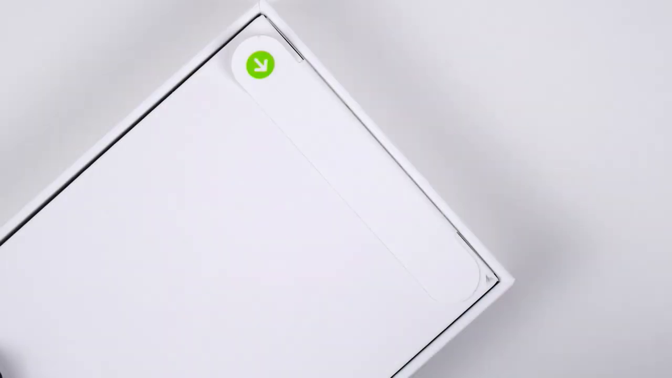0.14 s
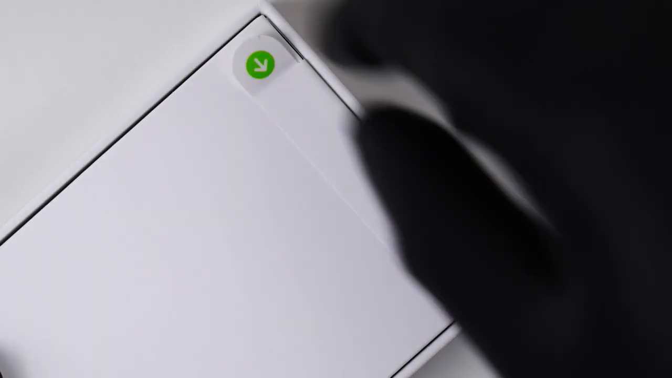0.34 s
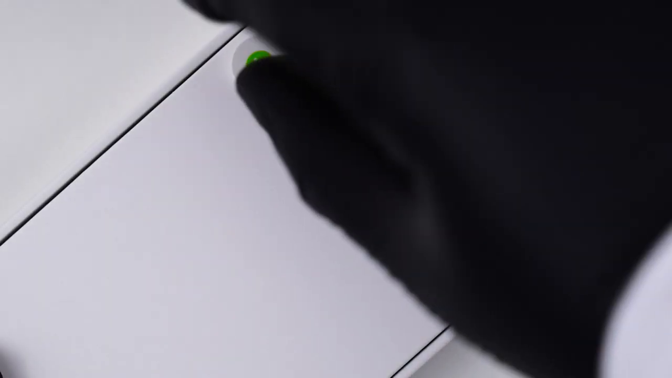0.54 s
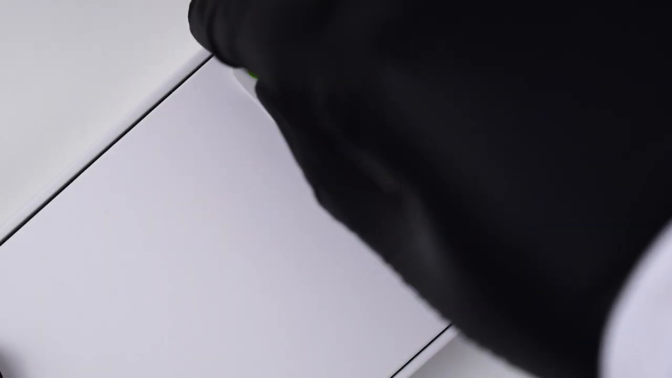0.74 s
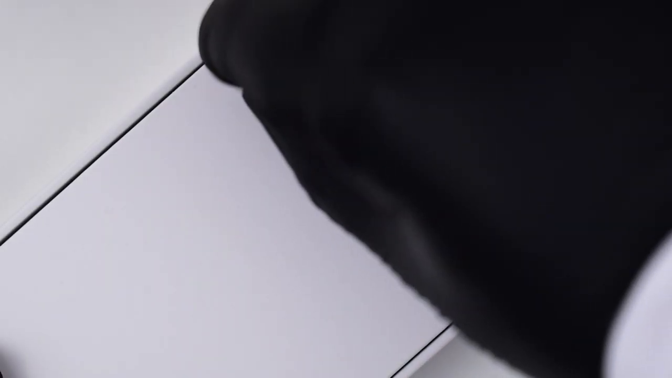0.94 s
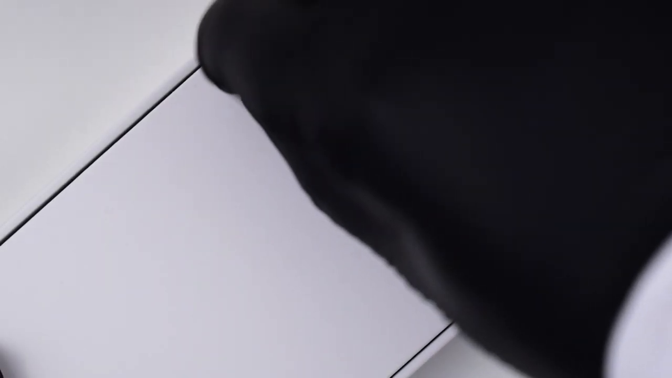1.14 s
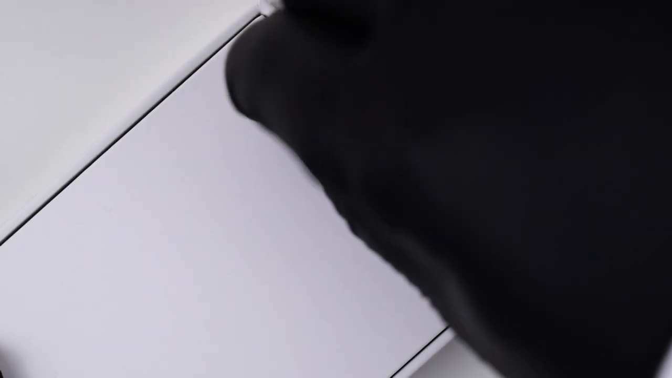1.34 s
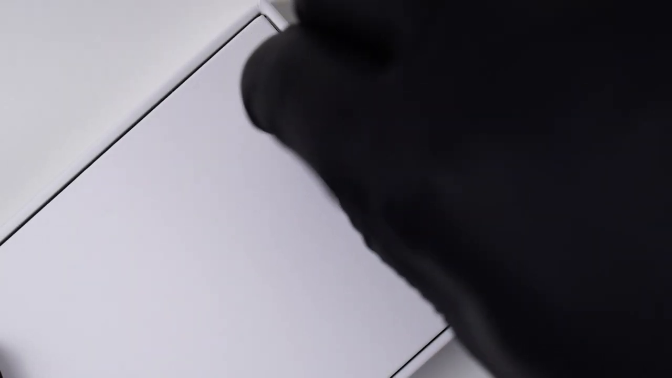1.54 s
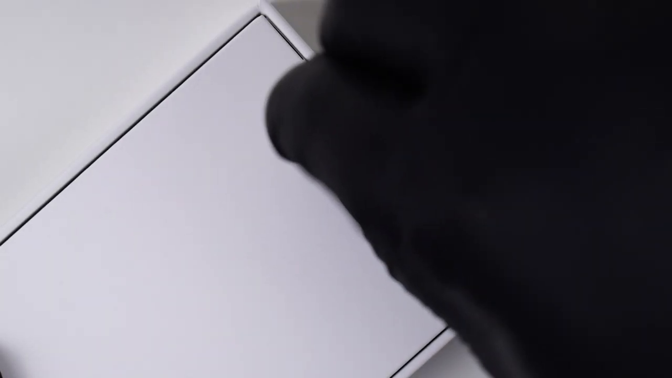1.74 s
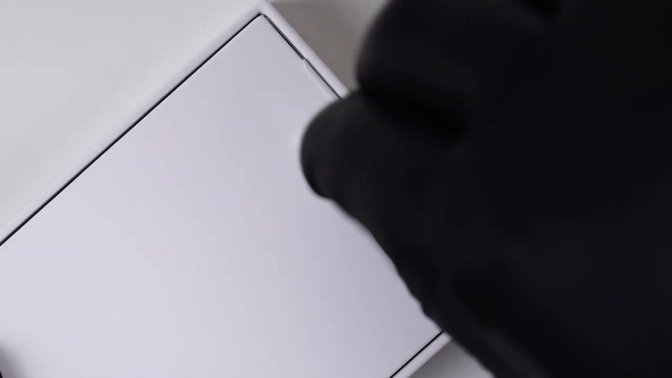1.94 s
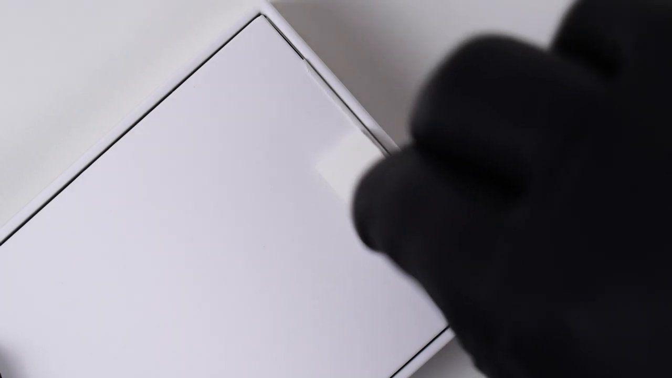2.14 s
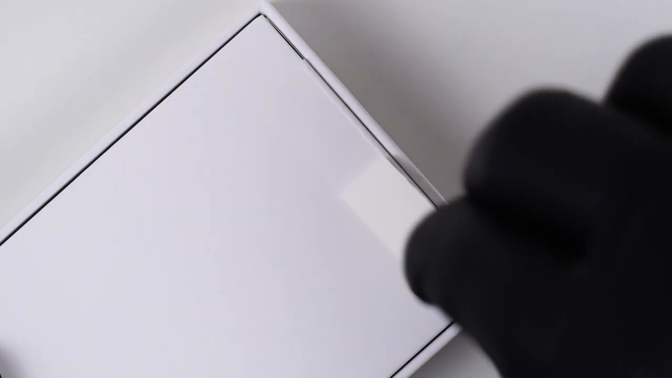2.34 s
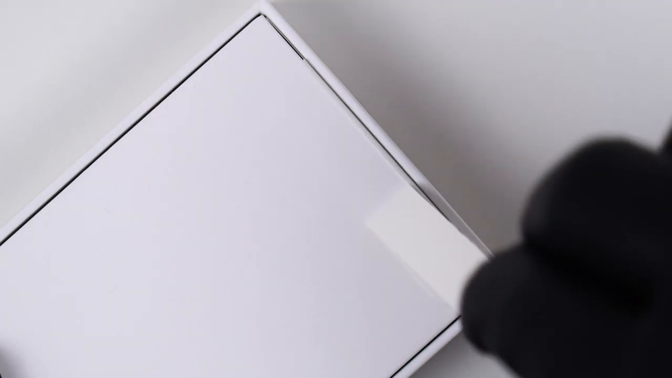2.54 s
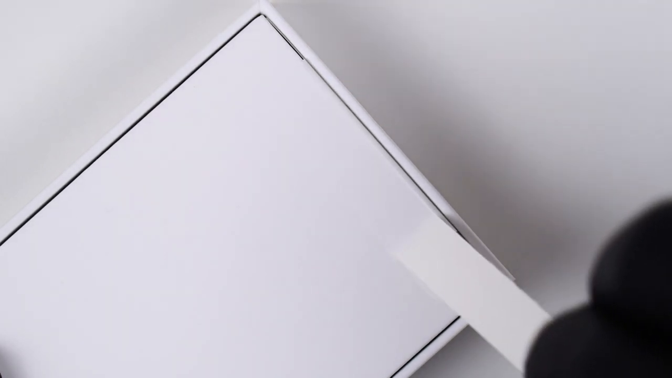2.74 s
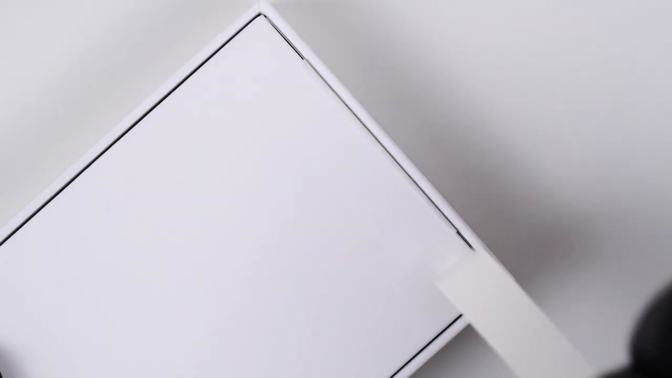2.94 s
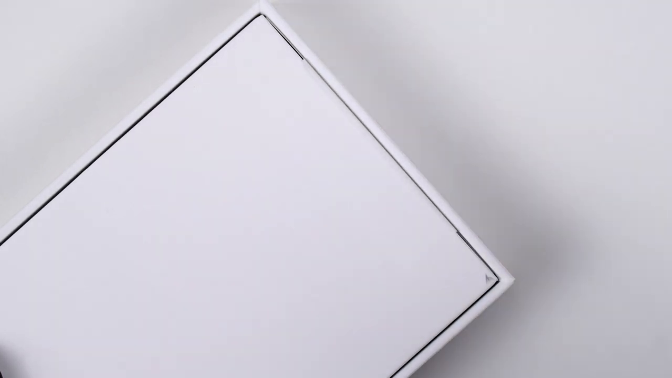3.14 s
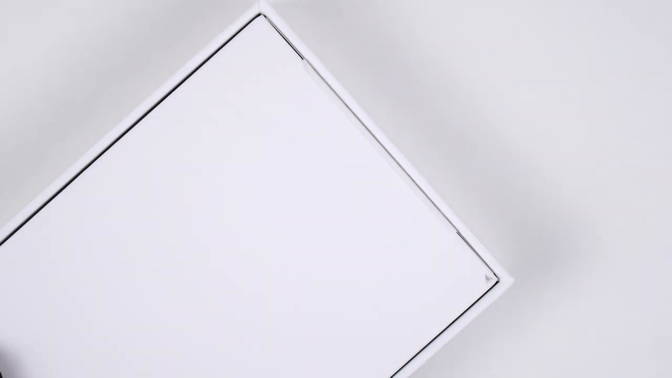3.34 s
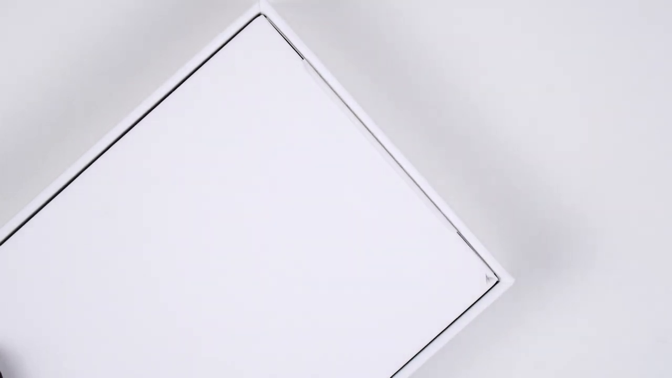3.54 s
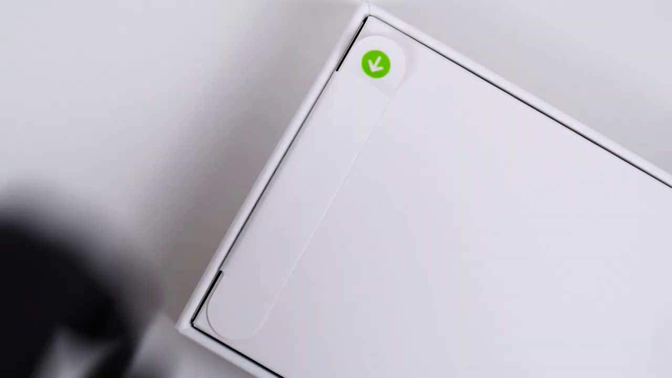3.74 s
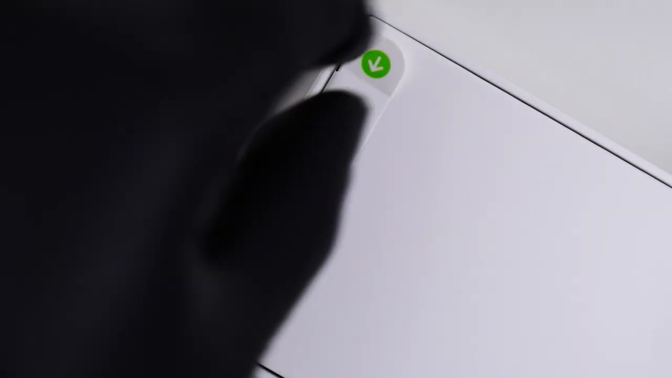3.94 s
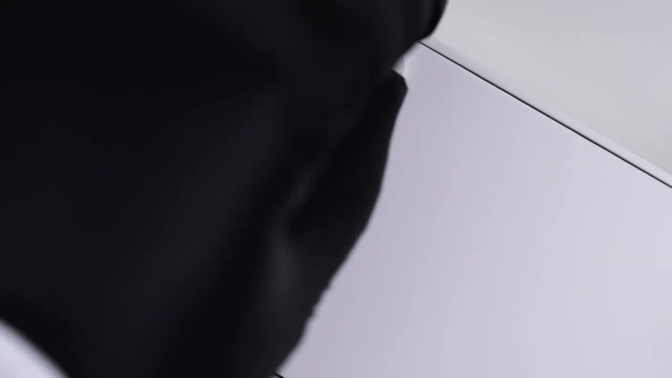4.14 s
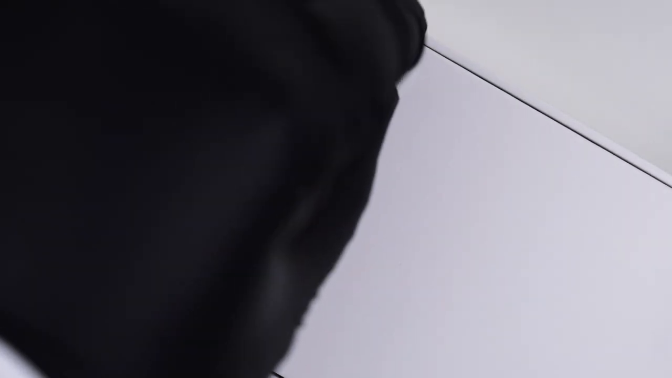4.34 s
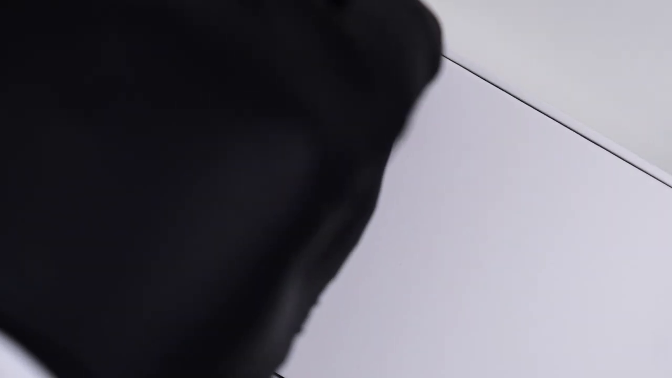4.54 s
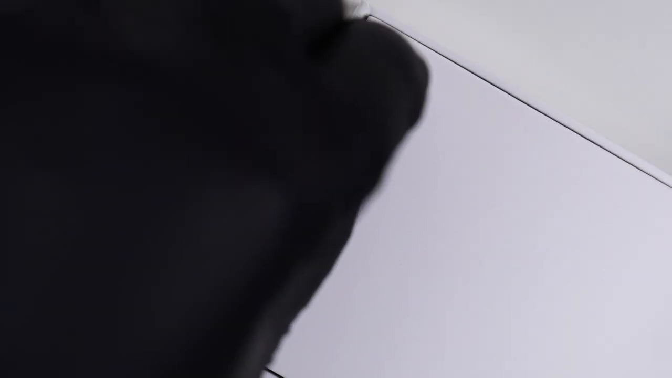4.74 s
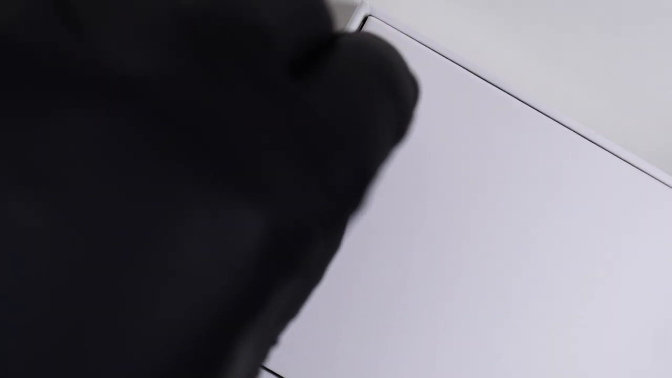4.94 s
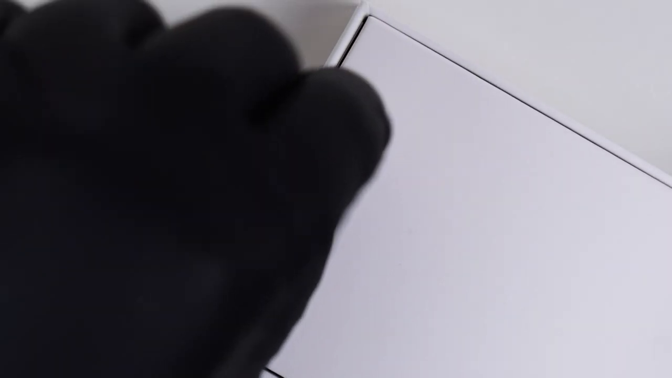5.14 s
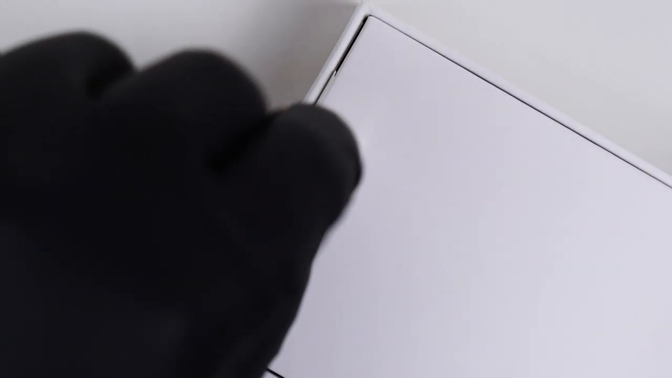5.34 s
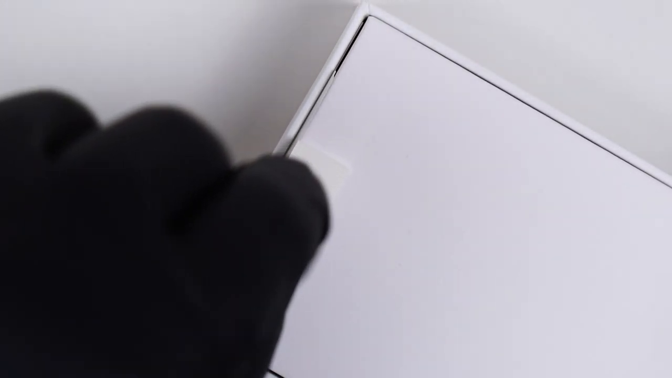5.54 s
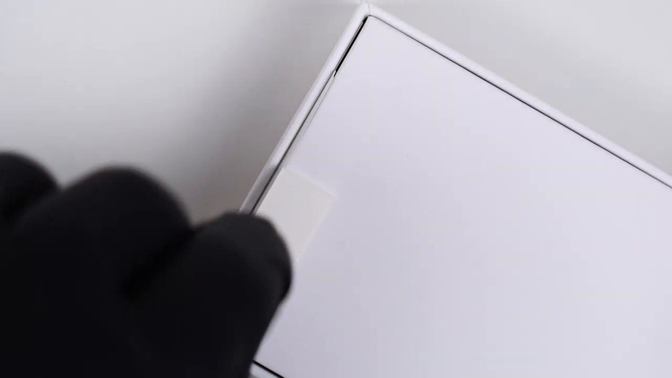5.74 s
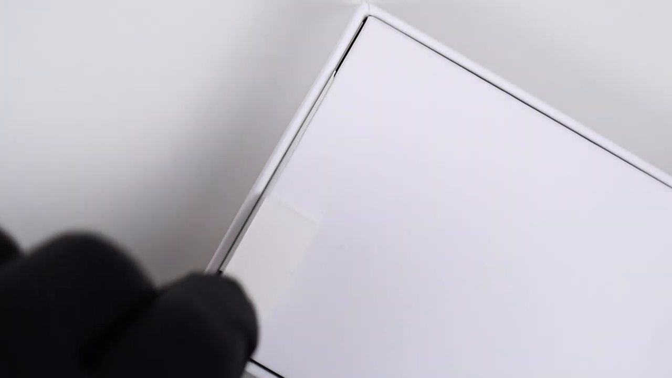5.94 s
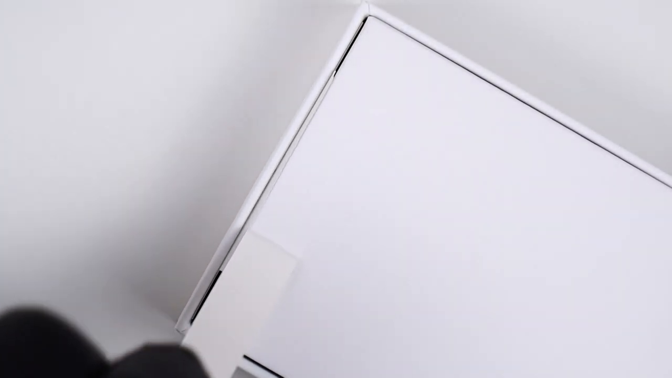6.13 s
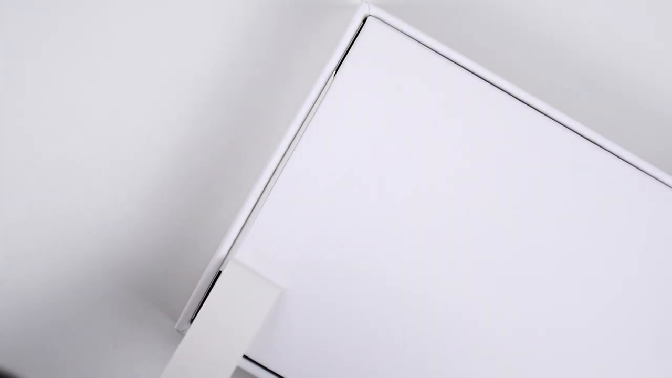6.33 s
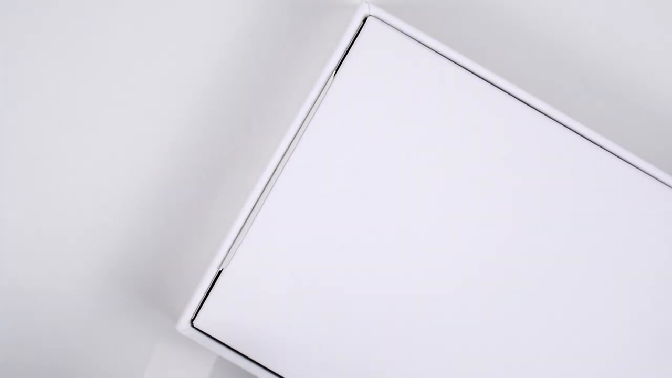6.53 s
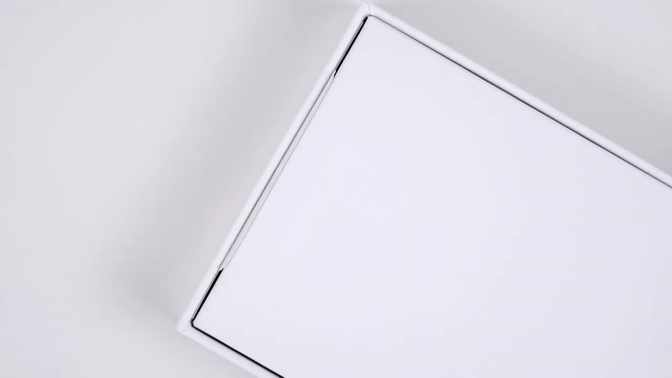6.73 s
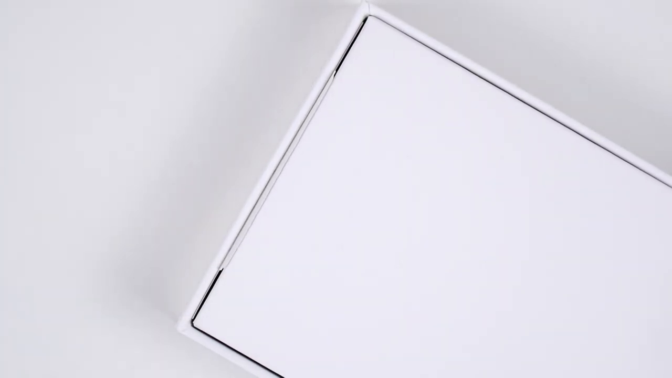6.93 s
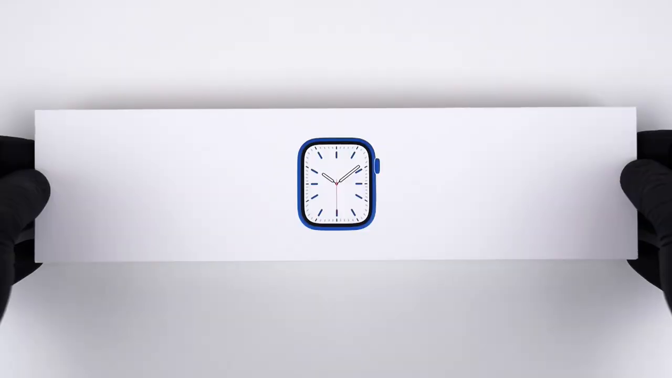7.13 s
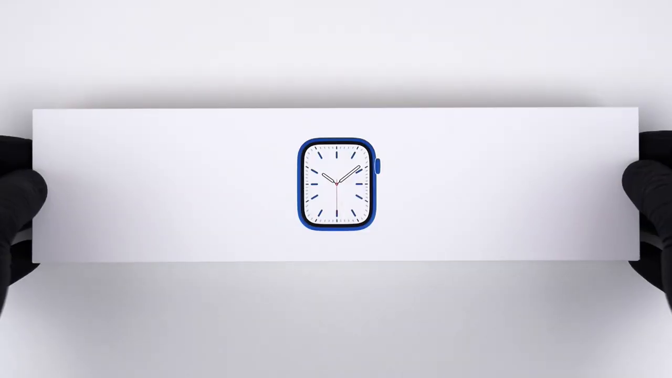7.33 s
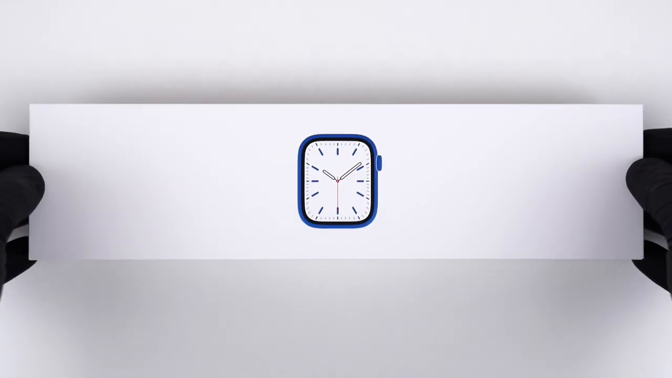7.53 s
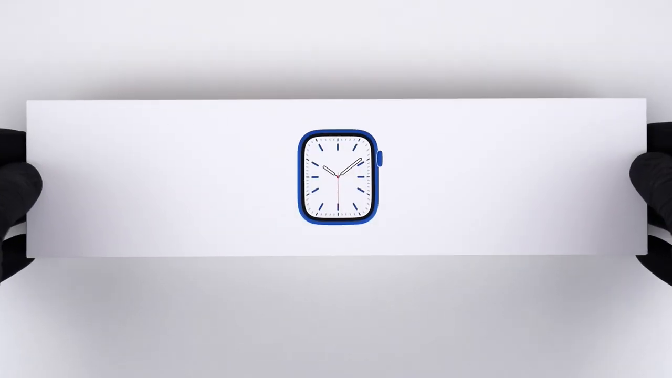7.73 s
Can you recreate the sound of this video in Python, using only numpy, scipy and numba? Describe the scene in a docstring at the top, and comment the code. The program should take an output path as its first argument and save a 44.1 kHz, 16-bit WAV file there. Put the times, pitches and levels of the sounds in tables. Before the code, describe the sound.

Two paper pull strips are ripped off a stiff cardboard box, each crackling zip ending in a loud snap and flick, then a brief card slide.

```python
"""Peeling strips off a box

Two paper pull strips are peeled off a stiff cardboard box, close to one microphone in a quiet room.
Tiny cracks of glue and fibre are sharp clicks that ring the lengthening strip (moving filters) and the lid.
Each strip lets go with a snap, squeaks over the edge and flicks free, as clicks, bending tones and ringing.
Sleeves brush past as soft noise, hands rumble and bump, and near the end the box slides with a short rustle.
"""
import sys
import numpy as np
from scipy import signal
from scipy.fft import rfft, irfft
from scipy.io import wavfile
from scipy.ndimage import uniform_filter1d
from numba import njit

SR = 44100
rng = np.random.default_rng(int(sys.argv[2]) if len(sys.argv) > 2 else 0)


def transcribe(signal):
    """Save signal, clipped to [-1, 1], as a 16-bit WAV file at the path in sys.argv[1]."""
    frames = np.atleast_2d(signal).T
    limited = np.clip(frames, -1, 1)
    pcm = np.round(limited * 32767).astype(np.int16)
    wavfile.write(sys.argv[1], SR, pcm)


N = 347456
TIME = np.arange(N) / SR  # seconds
TOP_HZ = 16400  # the recorder keeps nothing much above this

# In every "colour" table each row is: frequency in Hz, relative level in dB.
# In every "ring" table each row is: frequency in Hz, relative level in dB per Hz,
# time to fade by 60 dB in seconds.

# How hard each strip is pulled, from the first tear to the snap.
# Each row: time in seconds, effort in dB.
PULL_ONE = [(1.482, -0.5), (1.7, -2.5), (1.885, -4), (1.905, -1), (2.06, 3), (2.3, 2), (2.56, 0),
            (2.71, 2.5), (2.882, 1)]
PULL_TWO = [(4.72, -15.5), (4.96, -16), (5.0, -3.5), (5.3, -3.5), (5.7, 0), (6.0, -1.5), (6.447, 0.5)]
# The strip's resonances and the dead spots between them.
# Each row: multiple of the lowest resonance, boost or cut in dB for a fully taut strip.
STRIP_MODES = [(1, 3), (2, 5), (2.75, -10), (3.5, 7), (4.8, -5), (7.5, 5)]
TAUT_ONE, TAUT_TWO = 0.95, 0.6  # how clearly each strip rings, 0 to 1
# Lowest resonance of each strip in Hz, when short and when long.
STRIP_ONE_HZ, STRIP_TWO_HZ = (6600, 1080), (5500, 860)
# The ringing length grows along an S-curve: fastest at these times, and about this long either side.
MIDWAY_ONE_S, MIDWAY_TWO_S, GROW_S = 2.093, 5.66, 0.15
# Colour of the cracks of each strip.
CRACK_COLOUR_ONE = [(300, -25), (1500, -10), (2800, -9.5), (3600, -12.5), (4500, -0.5), (5600, -4),
                    (8000, -2.5), (10000, 0.5), (12500, 1), (14000, 0), (16000, -10.5)]
CRACK_COLOUR_TWO = [(300, -12), (1500, 1.5), (2600, 4.5), (3250, -2.5), (4500, 1.5), (5700, 0), (6700, 4.5),
                    (7500, 1), (8500, 4.5), (10500, 0.5), (12000, 2), (14200, 1), (15300, 6), (16000, -27)]
# Ring of the lid as the cracks shake it.
LID_RING = [(191, -2, 0.05), (450, 0, 0.1), (800, -4, 0.064), (1340, -2.5, 0.064), (2360, -4, 0.051),
            (3440, 1, 0.029), (14900, -33, .03)]
LID_HZ = (2550, 1380)  # where the lid answers most, as the peel line starts and ends its way across
LID_FOLLOW, LID_GAIN_DB = 0.82, 2  # share of the effort the lid follows; extra answer at the far corner

# Tough spots of glue that break.
# Each row: time in seconds, peak of the crack in dB, gain of the knock on the box in dB.
POPS = [(1.429, -24, -42), (1.482, -18, -39), (1.5623, -21.5, -38), (1.5905, -23.5, -45),
        (1.697, -33, -41.5), (1.72, -25, -45), (1.901, -30, -42.5), (1.989, -24, -58), (2.0573, -21, -46),
        (2.1745, -22.5, -40.5), (2.3957, -23.5, -36.5), (4.755, -42, -60), (4.807, -37, -55),
        (4.8862, -31.5, -45.5), (4.944, -34, -58), (4.99, -31, -50), (5.084, -33, -47), (5.2228, -29, -39),
        (5.2894, -44, -40.5), (5.7085, -37, -36), (6.09, -28, -43), (6.3292, -29, -43),
        (6.4122, -27, -36.5)]
# Shiver of the paper after such a break, a ring table.
POP_RING = [(1080, -13.0, 0.024), (10000, 8, 0.027), (16000, -6, 0.04)]
# Run of cracks after each tough spot: crackle against its peak, lid against its knock, fading time.
RUN_DB, RUN_LID_DB, RUN_S = -28, -11.5, 0.012

# The strip's end lets go. Each row: time in seconds, peak of the first crack in dB,
# gain of the knock on the box in dB, gain of the boom of the table in dB.
SNAPS = [(2.883, 1.5, -12, -1), (6.4475, 1, -11.5, -1.5)]
SNAP_COLOUR = [(200, -12), (1500, -0.5), (4000, -1), (6000, 1), (10000, -8), (14000, 8), (16000, 1)]
# Resonances of the box and of the table under it.
# Each row: frequency in Hz, level in dB, time to fade by 60 dB in seconds.
BOX_MODES = [(268, -27, 0.15), (375, -17.5, 0.15), (441, -29, 0.28), (551.6, -30.5, 0.23),
             (697, -14.5, 0.055), (757, -18.5, 0.096), (822, -21, 0.069), (975, -42, 0.049),
             (1143, -24.5, 0.093), (1275, -18.5, 0.079), (1402, -19, 0.046), (1655, -30, .08),
             (1870, -34, 0.059), (2160, -43, .1), (2750, -38, 0.21)]
TABLE_MODES = [(27.7, -34, 0.86), (58, -36.5, 0.35), (87, -42, 1.38), (121.7, -30.5, 0.33),
               (152.5, -36, 0.2), (190, -60, 0.26)]
# Dense ring of the box and of the loose strip.
BOX_RING = [(99.6, 8.5, 0.26), (350, -5.5, 0.2), (700, -3.5, 0.14), (1410, -1, 0.11), (2600, -4, 0.068),
            (5000, -8.5, 0.066), (9000, -8, 0.08), (15000, -10.5, 0.038)]
STRIP_RING = [(202, -12.5, 0.16), (800, -3, 0.1), (2440, 3.5, .13), (4030, -6, 0.083), (7800, 2, 0.07),
              (15000, -26, 0.042)]

# The strip drags over the edge just before it flicks free. Each row: start in seconds,
# length in seconds, middle pitch of the squeak in Hz, levels of squeak and hiss in dB before the slips shape them.
DRAGS = [(2.962, .051, 1063, -44, -47.5), (6.522, 0.03, 1020, -57, -46.5)]
DRAG_COLOUR = [(300, 0), (2000, 3.0), (5000, -5), (9000, 5.5), (16000, -11.5)]
SLIP_S = 0.0133  # one slip of the dragging strip
SQUEAK_BEND, SQUEAK_ROUGH = 0.07, 0.051  # bend of the pitch with each slip, and its wavering, as shares
# The loose strip flicks off the edge.
# Each row: time in seconds, peak in dB, ring in dB before a further cut of 4.5 dB.
FLICKS = [(3.0115, -5, -25.5), (6.551, -3, -25.5)]
FLICK_COLOUR = [(200, -24), (900, 3.5), (3000, 6.5), (5000, 5.5), (8000, 8.5), (12000, 0), (16000, -7)]

SLIDE_COLOUR = [(150, -17), (480, -6.5), (750, -7), (1000, -3), (1150, -4), (1400, 2), (1750, -9.5),
                (2800, -14), (5000, -22.5), (9000, -34), (12000, -24), (16000, -37)]
SLIDE_S, SLIDE_LENGTH_S = 7.121, 0.37
SLIDE_ATTACK_S, SLIDE_RELEASE_S = 0.0075, 0.079
SLIDE_DB = -50.5  # level half way
SLIDE_SWELL_DB_PER_S, SLIDE_BRIGHTEN_DB_PER_S = 11, 38

# The hand holds and loads the box.
# Each row: start in seconds, length in seconds, rumble in dB before trembling.
GRIPS = [(1.19, 1.78, -53.5), (4.68, 1.89, -55.5)]
GRIP_ATTACK_S, GRIP_RELEASE_S, TREMBLE_DB = 0.46, 0.13, 1.5
RUMBLE_COLOUR = [(15, -0.5), (28, 4.5), (45, -2.5), (85, -1.0), (125, -3), (190, -12), (300, -19.5),
                 (1000, -45.5)]
# Soft bumps of the fingers. Each row: start in seconds, length in seconds, pitch in Hz, peak in dB.
BUMPS = [(1.201, 0.057, 157, -55), (1.204, 0.12, 82, -48.5), (2.63, .16, 60, -50),
         (5.069, 0.15, 85.6, -50.5), (7.668, 0.16, 91.2, -56)]
# A glove tip ticks on the card.
# Each row: start in seconds, length in seconds, centre in Hz, level in dB before shaping.
GLOVE_TICKS = [(7.713, 0.011, 3650, -58)]
# Sleeves brush past. Each row: start in seconds, length in seconds, rise in seconds,
# fall in seconds, level in dB before the random flutter.
SLEEVES = [(-.08, 0.71, 0.17, 0.31, -59.5), (3.586, .56, .035, 0.43, -58.5), (4.35, .11, .05, .05, -65)]
SLEEVE_COLOUR = [(300, -7), (1200, -2.5), (3500, 0), (8000, -1), (12000, -2.5), (16000, -13)]

# Colour of the quiet room.
ROOM_COLOUR = [(12, -29), (20, 4), (70, -9), (96, -6), (204, -14.5), (277, -16), (472, -20), (607, -16.5),
               (718, -22), (873, -22.5), (2460, -26.5), (10500, -26.5), (16000, -30.5)]
ROOM_DB = -58
# Faint echo of the walls, a ring table.
WALLS_RING = [(10, -16, 0.29), (403, 6.5, 0.43), (3000, -0.5, 0.33), (15000, -3.5, 0.53)]
WALLS_DB = -23
# Colour of the recorder's steady hiss.
HISS_COLOUR = [(12, -29), (20, -1), (198, -7), (310, -4), (388, -12), (13500, -18), (16000, -15.5)]
HISS_DB = -77


def undb(db):
    """Turn decibels into a gain."""
    return 10 ** (np.asarray(db) / 20)


def unit(x):
    """Scale to an average strength (rms) of 1."""
    return x / np.sqrt(np.mean(x ** 2))


def curve(rows):
    """Join (seconds, value) points by straight lines."""
    return np.interp(TIME, *np.transpose(rows))


def during(rows):
    """Mark the time between the first and last row of a table."""
    return (TIME >= rows[0][0]) & (TIME <= rows[-1][0])


def envelope(s, length, attack, release):
    """Rise, hold at 1 and fall, all within the length."""
    return np.clip(np.minimum((TIME - s) / attack, (s + length - TIME) / release), 0, 1)


def swell(length):
    """Give the time axis and rounded envelope of a short rub."""
    t = TIME[:int(length * SR)]
    return t, np.sin(np.pi * t / length)


def add(out, s, x):
    """Mix x into out at time s."""
    i = int(round(s * SR))
    out[i:i + len(x)] += x[:N - i]


def through(x, response):
    """Let every sample of x set off a copy of the response."""
    return signal.oaconvolve(x, response)[:len(x)]


def click(colour, size=1024):
    """Make a pulse of peak 1 with the given colour, its energy packed as early as possible."""
    hz, db = np.transpose(colour)
    bins = np.maximum(np.fft.rfftfreq(size, 1 / SR), 1)
    level_db = np.interp(np.log(bins), np.log(hz), db)
    # folding the cepstrum forward puts all the energy after the start
    cepstrum = irfft(np.log(undb(level_db)))
    cepstrum[1:size // 2] *= 2
    cepstrum[size // 2 + 1:] = 0
    pulse = irfft(np.exp(rfft(cepstrum)))
    return pulse / np.abs(pulse).max()


def noise(colour, size=1024):
    """Make coloured noise of rms 1."""
    return unit(through(rng.standard_normal(N), click(colour, size=size)))


def walk(rate):
    """Wander smoothly at random, through about `rate` new values a second, with rms 1."""
    return unit(np.interp(TIME * rate, np.arange(N), rng.standard_normal(N)))


@njit
def resonance(x, hz, share):
    """Band-pass with a moving centre, like a body whose pitch changes; width is a share of the centre."""
    y, band, low = np.empty(len(x)), 0., 0.
    for i in range(len(x)):
        g = np.tan(np.pi * min(hz[i] / SR, .45))
        v = (band + g * (x[i] - low)) / (1 + g * (g + share))
        band, low, y[i] = 2 * v - band, low + 2 * g * v, share * v
    return y


def modes(rows):
    """Add up the fading sines of a struck body, neighbours swinging against each other."""
    t, out = TIME[:SR], np.zeros(SR)
    for k, (hz, db, t60) in enumerate(rows):
        fade = np.exp(-np.log(1000) * t / t60)
        out += (-1) ** k * undb(db) * fade * np.sin(2 * np.pi * hz * t)
    return out


def ring(rows, count=16):
    """Stand in for crowded resonances by noise bands that each fade at their own pace, from rms 1."""
    hz, db, t60 = np.transpose(rows)
    t, bins = TIME[:SR], np.fft.rfftfreq(SR, 1 / SR)
    white = rfft(rng.standard_normal(len(t)))
    edges = np.geomspace(hz[0], TOP_HZ, count + 1)
    tinted = white * undb(np.interp(np.log(bins + 1), np.log(hz), db))
    bands = np.array([irfft(tinted * (bins >= lo) * (bins < hi)) for lo, hi in zip(edges, edges[1:])])
    middles = np.log(edges[1:] * edges[:-1]) / 2
    decay = np.interp(middles, np.log(hz), t60)
    fading = bands * np.exp(-np.log(1000) * t / decay[:, None])
    return fading.sum(0) / bands.sum(0).std()


def cracks(rate, spread_db, bunch_db, even_s):
    """Break at random, `rate` times a second: many small breaks and few large, in bunches."""
    chance = rng.random(N)
    size = np.minimum(rng.exponential(size=N), np.log(100))
    breaks = (chance < rate / SR) * undb(spread_db * size) * rng.choice([-1, 1], N)
    # the steady pull of the hand evens out the energy released
    energy = uniform_filter1d(breaks ** 2, int(even_s * SR))
    return breaks / np.sqrt(energy + 1e-9) * undb(bunch_db * walk(70))


def peel(pull, midway_s, strip_hz, colour, lid, taut, rate, spread_db, bunch_db, even_s,
         shiver_s, shiver_db, crackle_db, lid_db, focus_db):
    """Cracks along the glue line ring the lengthening strip and shake the lid, louder with the effort."""
    breaks = cracks(rate, spread_db, bunch_db, even_s)
    effort = curve(pull)
    freed = 1 / (1 + np.exp((midway_s - TIME) / GROW_S))  # 0 for a short strip, 1 for a long one

    # each crack is a sharp pulse followed by its own fading shiver of the paper
    energy = signal.lfilter([1], [1, -np.exp(-1 / (shiver_s * SR))], breaks ** 2)
    shiver = unit(np.sqrt(energy) * rng.standard_normal(N))
    crackle = through(unit(breaks) + undb(shiver_db) * shiver, click(colour))

    # the lowest resonance falls as the strip grows longer
    hz = 1 / ((1 - freed) / strip_hz[0] + freed / strip_hz[1])
    for multiple, full_db in STRIP_MODES:
        db = full_db * taut
        crackle = crackle + (undb(db) - 1) * resonance(crackle, multiple * hz, .2 * undb(-db / 2))

    body = through(breaks, lid)
    lid_hz = (1 - freed) * LID_HZ[0] + freed * LID_HZ[1]
    body = body + undb(focus_db) * resonance(body, lid_hz, 0.27)

    peeling = during(pull)
    crackle = peeling * crackle / crackle[peeling].std()
    body = peeling * body / body[peeling].std()
    steady = undb([crackle_db + effort, lid_db + LID_FOLLOW * effort + LID_GAIN_DB * freed])
    crackle_gain, lid_gain = np.hypot(steady, runs())  # the energies add
    return crackle_gain * crackle + lid_gain * body


def runs():
    """Each tough spot that gives way sets off a fading run of cracks: its strength in strip and lid."""
    strength = np.zeros((2, N))
    for s, peak_db, knock_db in POPS:
        fade = (TIME >= s) * np.exp(-np.abs(TIME - s) / RUN_S)
        strength += undb([[peak_db + RUN_DB], [knock_db + RUN_LID_DB]]) * fade
    return strength


def pops(box):
    """Each tough spot of glue breaks with one crack, a shiver of the paper and a knock on the box."""
    out, crack = np.zeros(N), click(CRACK_COLOUR_ONE)
    shiver = undb(-19.5) * ring(POP_RING, count=2)
    for s, peak_db, knock_db in POPS:
        add(out, s, undb(peak_db) * crack)
        add(out, s, undb(peak_db) * shiver)
        add(out, s, undb(knock_db) * box)
    return out


def snaps(box):
    """The last fibres break in a quick run of four cracks; box and table spring back."""
    out, crack, table = np.zeros(N), click(SNAP_COLOUR), modes(TABLE_MODES)
    for s, peak_db, knock_db, boom_db in SNAPS:
        lags = np.cumsum(rng.uniform(.00018, 0.00032, size=4))  # seconds
        for k, lag in enumerate(lags - lags[0]):
            add(out, s + lag, undb(peak_db - 2.8 * k) * crack)
        add(out, s, undb(knock_db) * box)
        add(out, s, undb(boom_db) * table)
    return out


def drags():
    """The loose strip sticks and slips over the edge: a squeak that bends with each slip, plus hiss."""
    out, hiss, waver = np.zeros(N), noise(DRAG_COLOUR), walk(500)
    for s, length, hz, squeak_db, hiss_db in DRAGS:
        t = TIME[:int(length * SR)]
        now = int(s * SR) + np.arange(len(t))
        slips = np.abs(np.sin(np.pi * t / SLIP_S))
        pitch = hz * (1 + SQUEAK_BEND * (slips - slips.mean()) + SQUEAK_ROUGH * waver[now])
        squeak = np.sin(2 * np.pi * np.cumsum(pitch) / SR) * np.sqrt(2)
        add(out, s, slips * (undb(squeak_db) * squeak + undb(hiss_db) * hiss[now]))
    return out


def flicks():
    """The loose strip whips free with a sharp pulse, then shivers as a dense fading ring."""
    out = np.zeros(N)
    for s, peak_db, ring_db in FLICKS:
        add(out, s, -undb(peak_db) * click(FLICK_COLOUR))
        add(out, s, undb(ring_db - 4.5) * ring(STRIP_RING))
    return out


def slide():
    """Dense slips of card sound the hollow box, louder and brighter as it speeds up."""
    slips = cracks(rate=6000, spread_db=3.0, bunch_db=1.0, even_s=0.024)
    rub = unit(through(slips, click(SLIDE_COLOUR)))
    low = signal.sosfilt(signal.butter(1, 1100, fs=SR, output="sos"), rub)
    from_middle = np.clip(TIME - SLIDE_S, 0, SLIDE_LENGTH_S) - SLIDE_LENGTH_S / 2  # seconds
    bright = undb(SLIDE_BRIGHTEN_DB_PER_S * from_middle)
    shape = envelope(SLIDE_S, SLIDE_LENGTH_S, SLIDE_ATTACK_S, SLIDE_RELEASE_S)
    gain = shape * undb(SLIDE_DB + SLIDE_SWELL_DB_PER_S * from_middle)
    return gain * (low / np.sqrt(bright) + (rub - low) * bright)


def grips():
    """The loaded box rumbles under the trembling hands: low noise with a wandering level."""
    load = sum(undb(db) * envelope(s, length, GRIP_ATTACK_S, GRIP_RELEASE_S) for s, length, db in GRIPS)
    return noise(RUMBLE_COLOUR, size=8192) * load * undb(TREMBLE_DB * walk(8))


def bumps():
    """Fingers bump the box softly: short low tones that swell and fade."""
    out = np.zeros(N)
    for s, length, hz, db in BUMPS:
        t, shape = swell(length)
        add(out, s, undb(db) * shape * np.sin(2 * np.pi * hz * t))
    return out


def glove_ticks():
    """A glove tip ticks on the card: a very short rub of noise around one pitch."""
    out = np.zeros(N)
    for s, length, hz, db in GLOVE_TICKS:
        t, shape = swell(length)
        rub = resonance(rng.standard_normal(len(t)), np.full(len(t), float(hz)), 0.12)
        add(out, s, undb(db) * shape * unit(rub))
    return out


def sleeves():
    """Cloth brushes past: soft noise that swells, fades and flutters a little."""
    brush = sum(undb(db) * envelope(s, length, rise, fall) for s, length, rise, fall, db in SLEEVES)
    return noise(SLEEVE_COLOUR) * brush * undb(1.15 * walk(40))


def room():
    """The quiet room is a steady coloured noise."""
    return noise(ROOM_COLOUR, size=8192) * undb(ROOM_DB)


def walls(near):
    """The walls send back a faint echo: the sound smeared through a fading noise."""
    tail = ring(WALLS_RING, count=4)
    return undb(WALLS_DB) * through(near, tail / np.linalg.norm(tail))


def scene():
    """Mix the box close to the microphone with the quiet room and the faint echo of its walls."""
    tones = modes(BOX_MODES)
    box = tones + undb(-10.0) * ring(BOX_RING)
    lid = undb(-16.5) * tones + undb(-11.0) * ring(LID_RING)
    first = peel(PULL_ONE, MIDWAY_ONE_S, STRIP_ONE_HZ, CRACK_COLOUR_ONE, lid, TAUT_ONE,
                 rate=1900, spread_db=5.5, bunch_db=1.15, even_s=.016, shiver_s=0.004, shiver_db=-6,
                 crackle_db=-49.5, lid_db=-56.5, focus_db=-6.5)
    second = peel(PULL_TWO, MIDWAY_TWO_S, STRIP_TWO_HZ, CRACK_COLOUR_TWO, lid, TAUT_TWO,
                  rate=2000, spread_db=5.0, bunch_db=2.1, even_s=0.018, shiver_s=0.0017, shiver_db=-5.0,
                  crackle_db=-52.0, lid_db=-55, focus_db=0)
    near = first + second + pops(box) + snaps(box) + drags() + flicks() + slide()
    near = near + grips() + bumps() + glove_ticks() + sleeves() + room()
    heard = near + walls(near)
    return np.array([heard, heard])


def record(dry):
    """The recorder adds faint hiss, opposite in the two channels, and cuts the top of the treble."""
    hiss = undb(HISS_DB) * noise(HISS_COLOUR, size=4096) * np.array([[1], [-1]])
    return signal.sosfilt(signal.ellip(10, .1, 80, TOP_HZ, fs=SR, output="sos"), dry + hiss)


dry = scene()
out = record(dry)
transcribe(out)
```